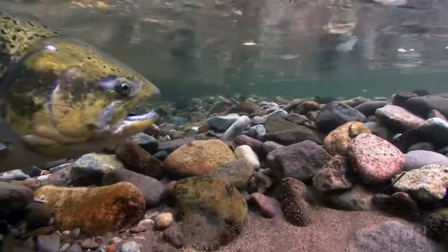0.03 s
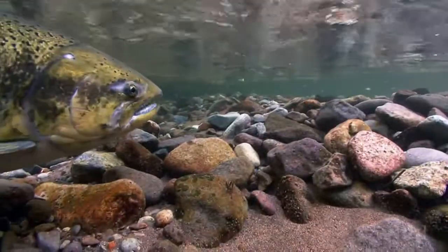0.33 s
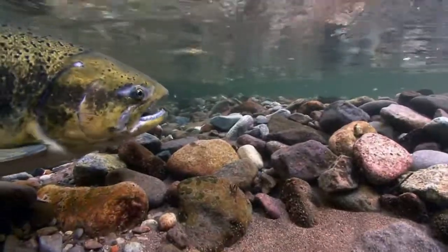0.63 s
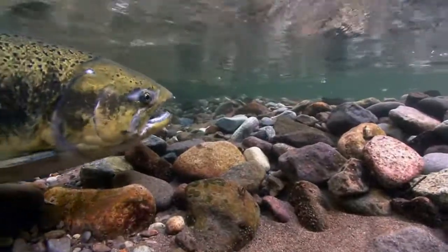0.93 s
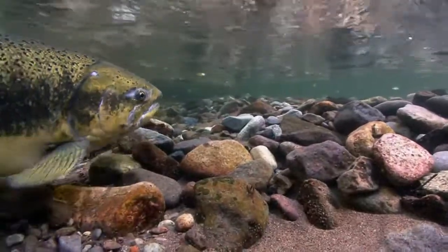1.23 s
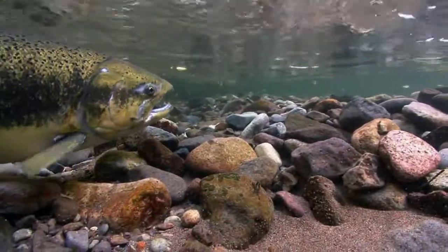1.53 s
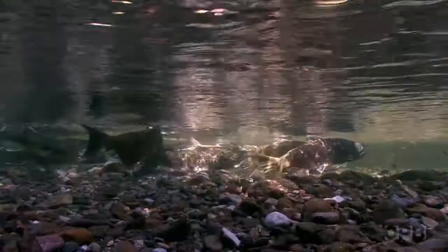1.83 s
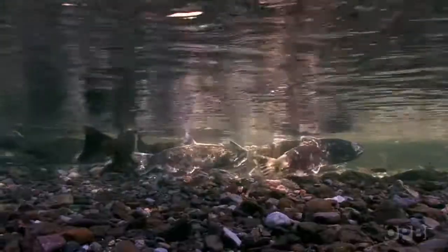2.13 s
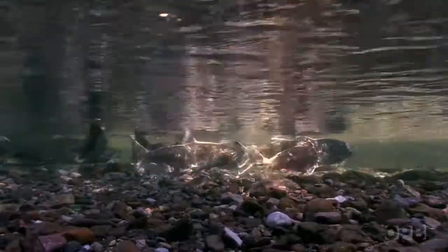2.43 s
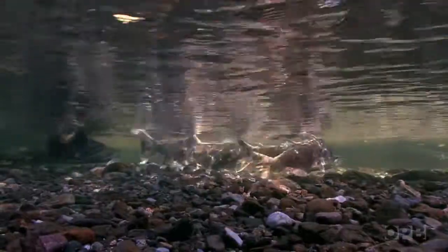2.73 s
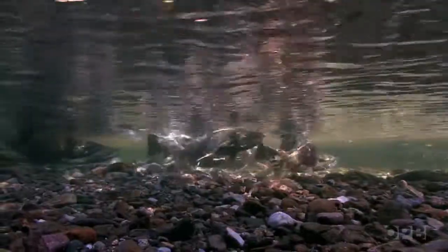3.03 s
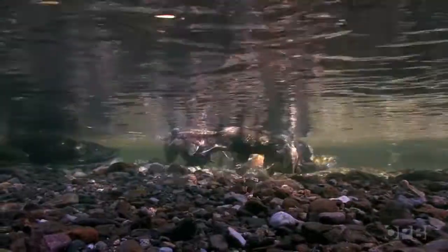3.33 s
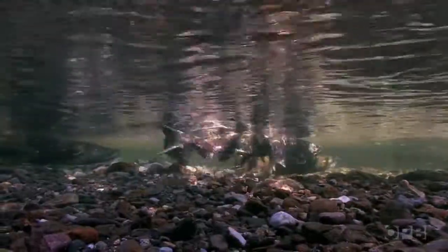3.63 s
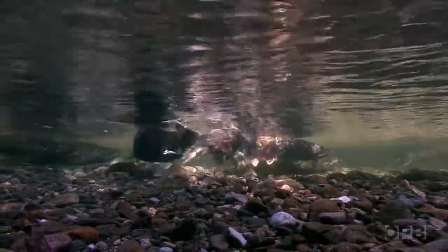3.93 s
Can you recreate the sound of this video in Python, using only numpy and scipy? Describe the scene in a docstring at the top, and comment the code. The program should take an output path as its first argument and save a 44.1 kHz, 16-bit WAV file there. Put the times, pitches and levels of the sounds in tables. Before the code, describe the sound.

Low underwater rush of a river, with bubble plops and flurries of clicking pebbles.

```python
"""Gravel riverbed, under water

A microphone lies on the bed of a shallow river, heard in the left channel only. The current rushes
and buffets it with a low rumble. Air bubbles ring at first and a fine fizz goes on. Pebbles shift
and knock in two dull flurries that also ring the microphone housing, with fine ticks of grit."""
import sys
import numpy as np
from scipy import signal
from scipy.fft import rfft, irfft
from scipy.io import wavfile

SR = 44100
rng = np.random.default_rng(int(sys.argv[2]) if len(sys.argv) > 2 else 0)


def transcribe(u):
    """Save the signal u as a 16-bit wav file named by the first command-line argument.

    u: samples, shape (n,) or (channels, n), limited to [-1, 1]; the rate is SR.
    q: integer samples, one column per channel.
    """
    v = np.clip(np.atleast_2d(u).T, -1, 1)
    q = np.round(v * 32767).astype(np.int16)
    wavfile.write(sys.argv[1], SR, q)


N = 176400
T = np.arange(N) / SR


def from_db(db):
    """Decibels to gain."""
    return 10 ** (np.asarray(db) / 20)


def unit_rms(x):
    """Scale to rms 1."""
    return x / np.sqrt(np.mean(x ** 2) + 1e-20)


def level(curve):
    """Gain over time from rows of time_s, level_db."""
    return from_db(np.interp(T, *np.transpose(curve)))


def noise(spectrum):
    """Unit-rms noise shaped by rows of freq_hz, density_db."""
    hz, db = np.transpose(spectrum)
    bins_hz = np.maximum(np.fft.rfftfreq(N, 1 / SR), 1)
    gain = from_db(np.interp(np.log(bins_hz), np.log(hz), db))
    return unit_rms(irfft(rfft(rng.standard_normal(N)) * gain, N))


def band(x, low_hz, high_hz, order=4):
    """Causal band-pass."""
    return signal.sosfilt(signal.butter(order, [low_hz, high_hz], "band", fs=SR, output="sos"), x)


def ring(clicks, hz, t60_s):
    """Resonator: each click starts a damped sine of its own height."""
    r, w = from_db(-60 / (t60_s * SR)), 2 * np.pi * hz / SR
    return signal.lfilter([0, np.sin(w)], [1, -2 * r * np.cos(w), r * r], clicks + 1e-18)


def grains(per_s, spread_db):
    """Random clicks of uneven size and sign."""
    sizes = from_db(spread_db * np.minimum(rng.exponential(1, N), 4))
    return sizes * rng.choice([-1, 1], N) * (rng.random(N) < per_s / SR)


def dying_sine(hz, t60_s, attack_s, rise_per_s=0, sustain=1):
    """Sine that swells and decays; sustain above 1 holds the ring, then drops it faster."""
    t = T[:SR // 4]
    envelope = (1 - np.exp(-t / attack_s)) * from_db(-60 * (t / t60_s) ** sustain)
    phase = 2 * np.pi * hz * (t + rise_per_s * t * t / 2)
    return envelope / envelope.max() * np.sin(phase)


def add(track, start_s, sound, gain_db):
    """Mix a sound into the track."""
    start = int(start_s * SR)
    part = sound[:max(N - start, 0)]
    track[start:start + len(part)] += from_db(gain_db) * part


# freq_hz, density_db
RUSH_SPECTRUM = [(12, -18.5), (33, 5.5), (50, -12), (100, -2), (160, -1.5), (250, -5), (320, -8.5),
                 (480, -10.5), (750, -21), (1000, -18), (1400, -28.5), (1850, -33.5), (2250, -41.5),
                 (3100, -40.5), (3500, -48), (3800, -64.5), (6000, -75.5)]


def rush():
    """The current flows past with a steady, low noise."""
    return from_db(-30) * noise(RUSH_SPECTRUM)


# time_s, level_db
WATER_PUSH = [(0, -29.5), (.12, -26.5), (.25, -34), (.43, -31), (.49, -25), (.55, -27), (.61, -33),
              (.8, -35), (1.25, -38), (1.53, -36), (1.62, -30.5), (1.72, -32.5), (1.9, -37.5),
              (2.08, -42.5), (4, -47)]
# freq_hz, density_db
BUFFET_SPECTRUM = [(12, -20.5), (25, -11.5), (55, 3.5), (100, -8.5), (160, -10.5), (260, -27), (500, -21),
                   (1200, -75.5)]


def buffeting():
    """Water pushes on the microphone in rumbling surges that churn when strong."""
    push = level(WATER_PUSH)
    rumble = from_db(5.5) * push * noise(BUFFET_SPECTRUM)
    churn = unit_rms(band(rng.standard_normal(N), low_hz=119, high_hz=207.5))
    return rumble + from_db(-26.5) * (push / push.max()) ** 2 * churn


# time_s, level_db
HISS_LEVEL = [(0, -68), (1.65, -65.5), (1.85, -69.5), (3.468, -68), (3.476, -74), (4, -75)]
# freq_hz, density_db
HISS_SPECTRUM = [(1000, -18), (3900, -2), (4900, 8), (6000, 4), (7500, 3.5), (7900, 6), (8400, 3),
                 (11000, 2), (15000, 0)]


def hiss():
    """Faint high noise that drops near the end."""
    return level(HISS_LEVEL) * noise(HISS_SPECTRUM)


# freq_hz, gain_db, t60_s
KNOCK_MODES = [(546, -0.5, 0.024), (757, 1.5, 0.035), (1152, -4.5, 0.013), (1707, -13, 0.015),
               (1930, -19.5, 0.021), (2310, -24, 0.0072)]


def knock_ring(clicks, pitch_hz, bright_db):
    """Contacts ring two low pebble tones, set by size, and four fixed modes of the microphone housing."""
    reference_hz = 740
    out = 0
    for k, (hz, db, t60_s) in enumerate(KNOCK_MODES):
        octaves_up = np.clip(np.log2(hz / reference_hz), 0, 1)
        mode_hz = hz * pitch_hz / reference_hz if octaves_up < .5 else hz
        out += (-1) ** k * from_db(db + bright_db * octaves_up) * ring(clicks, mode_hz, t60_s)
    return band(out, low_hz=432, high_hz=2235)


# time_s, level_db
GRAVEL_STIR = [(0, -39.5), (.6, -43), (1.17, -42), (1.26, -38), (1.42, -41), (1.66, -39), (1.8, -36.5),
               (1.88, -35.5), (2.03, -32), (2.18, -46.5), (2.31, -37.5), (2.5, -45.5), (2.61, -41),
               (2.75, -44.5), (3.45, -45.5), (3.56, -38.5), (3.7, -35.5), (3.8, -48), (4, -45)]


def gravel():
    """Many small, water-cushioned contacts among pebbles of several sizes."""
    pitches_hz = np.geomspace(640, 830, num=5)
    rattle = np.zeros(N)
    for hz in pitches_hz:
        contacts = grains(per_s=700 / len(pitches_hz), spread_db=2)
        rattle += knock_ring(contacts, hz, bright_db=-6.5)
    return from_db(5) * level(GRAVEL_STIR) * unit_rms(rattle)


def fizz():
    """Tiny bubbles in the current pip at random; smaller ones ring higher and shorter."""
    low_hz, high_hz, t60_cycles = 1452, 3496, 39
    pitches_hz = np.geomspace(low_hz, high_hz, num=14)
    pips = np.zeros(N)
    for hz in pitches_hz:
        onsets = grains(per_s=220 / len(pitches_hz), spread_db=2.5)
        pips += ring(onsets, hz, t60_cycles / hz)
    return from_db(-58.5) * unit_rms(band(pips, low_hz, high_hz))


# freq_hz, gain_db, t60_s
SAND_MODES = [(3120, 3.5, 0.0049), (4520, -7.5, 0.0069), (5230, -5.5, 0.0038), (6430, -10, 0.0045)]


def sand():
    """Drifting grains ring faintly, their level loosely following the hiss."""
    drift = np.zeros(N)
    for hz, db, t60_s in SAND_MODES:
        contacts = grains(per_s=700 / len(SAND_MODES), spread_db=3.5)
        drift += from_db(db) * ring(contacts, hz, t60_s)
    return from_db(-65.5) * unit_rms(drift * level(HISS_LEVEL) ** .11)


# start_s, level_db, pitch_hz, t60_s
BUBBLE_TONES = [(0.0513, -28.5, 1840, 0.033), (0.0532, -30.5, 2330, 0.014), (0.0521, -28.5, 1550, 0.019),
                (.053, -24.5, 590, 0.022), (.0532, -18, 797, 0.03), (.133, -28, 835, .025),
                (0.1999, -19.5, 803, 0.05), (.2595, -24.5, 840, 0.033), (0.354, -11, 800, 0.071),
                (0.3533, -34, 1580, 0.019), (.398, -28.5, 847, 0.035), (0.459, -20.5, 775, 0.044),
                (0.535, -43, 1520, 0.021), (.714, -30.5, 724, .026), (0.946, -43, 1510, .018),
                (2.673, -44, 1510, .016), (2.749, -41, 1790, .018), (3.992, -34.5, 1844, 0.0078)]


def bubbles():
    """Each row is one ringing, slightly rising tone; rows starting together form one bubble's plop."""
    out = np.zeros(N)
    for start_s, level_db, pitch_hz, t60_s in BUBBLE_TONES:
        tone = dying_sine(pitch_hz, t60_s, attack_s=.0008, rise_per_s=2.4, sustain=1.28)
        add(out, start_s, tone, level_db + 4.5)
    return out


# start_s, level_db, pitch_hz
EDDY_THUMPS = [(.072, -16, 88), (0.086, -13.5, 52), (.136, -20, 56.5), (0.463, -14.5, 59.5),
               (0.523, -22, 79), (0.71, -15, 50), (1.344, -14, 43.3), (1.568, -16, 47.5), (1.61, -22, 61.6),
               (2.786, -23, 49)]


def eddies():
    """Each eddy shoves the microphone for two or three slow swings."""
    out = np.zeros(N)
    for start_s, level_db, pitch_hz in EDDY_THUMPS:
        add(out, start_s, dying_sine(pitch_hz, t60_s=.081, attack_s=.0033), level_db)
    return out


# start_s, level_db, low_hz, high_hz
GRIT_TICKS = [(.258, -48, 4000, 6000), (.355, -29.5, 1090, 2600), (0.3565, -36, 2400, 5500),
              (0.355, -38, 5000, 15000), (1.338, -50, 3900, 5200), (1.747, -53, 5730, 6940),
              (1.776, -32, 1310, 4000), (1.776, -44, 3960, 8500), (1.876, -52, 4800, 6400),
              (1.908, -36.5, 3520, 7400), (1.9097, -28.5, 1790, 2700), (2.27, -41, 3530, 13000),
              (2.371, -43.5, 3500, 5500), (2.614, -49, 3800, 8000), (2.623, -47, 3800, 8400),
              (3.066, -49.5, 4000, 5940), (3.648, -46.5, 3800, 8400), (3.709, -36.5, 3400, 7500),
              (3.85, -43, 4200, 5940), (3.865, -44.5, 3100, 5150)]


def grit():
    """Single grains tick: a snap, a short crunch and a glassy ring."""
    snap_height, crunch_t60_s = 14.8, .014
    out, t = np.zeros(N), T[:SR // 30]
    for start_s, level_db, low_hz, high_hz in GRIT_TICKS:
        crack = rng.standard_normal(len(t)) * from_db(-60 * t / crunch_t60_s)
        crack[0] = snap_height
        glassy = from_db(-31.5) * ring(crack, hz=6500, t60_s=.018)
        tick = band(crack + glassy, low_hz, high_hz, order=3)
        add(out, start_s, tick / np.abs(tick).max(), level_db + 3.5)
    return out


# start_s, level_db, pitch_hz, bright_db
PEBBLE_KNOCKS = [(1.180, -24, 663, -6), (1.252, -23, 686, -10), (1.270, -26.5, 690, -7),
                 (1.297, -26.5, 807, -11), (1.648, -26, 723, -7), (1.7069, -24, 794, 2.5),
                 (1.712, -17.5, 718, -3), (1.7455, -18.5, 796, 5.5), (1.748, -17, 708, -4),
                 (1.758, -21, 720, -8), (1.7755, -15.5, 758, -2.5), (1.833, -20.5, 738, -5),
                 (1.846, -21.5, 730, 2), (1.859, -22.5, 700, -13), (1.882, -20, 683, -17),
                 (1.892, -20, 740, -21), (1.9077, -11, 787, -1.5), (1.934, -25, 695, -4),
                 (1.999, -20, 608, -7), (2.012, -34, 635, -3), (2.029, -29.5, 753, 6.5),
                 (2.0505, -16, 760, -10.5), (2.134, -26, 713, -5), (2.300, -20.5, 690, -4.5),
                 (2.317, -25, 760, -9), (2.3585, -20.5, 730, -7), (2.384, -29.5, 780, -18),
                 (2.586, -31, 725, 2), (2.614, -25.5, 777, 1), (2.623, -33, 680, 10),
                 (3.030, -25.5, 690, -21), (3.532, -27.5, 772, -17), (3.549, -26, 720, -4),
                 (3.632, -27.5, 770, -5), (3.649, -21.5, 804, 2), (3.672, -30, 760, 15),
                 (3.697, -24.5, 720, 5), (3.709, -13.5, 802, 2), (3.712, -18.5, 564, -21)]


def knocks():
    """Pebbles collide: one firm contact, then a few lighter touches as they settle."""
    touches, settle_s, knock_s = 3, .004305, .01
    out = np.zeros(N)
    for start_s, level_db, pitch_hz, bright_db in PEBBLE_KNOCKS:
        strengths = from_db(-3) * rng.uniform(-1.38, 1, touches)
        delays_s = rng.random(touches) * settle_s
        clicks = np.zeros(SR // 10)
        clicks[(delays_s * SR).astype(int)] = strengths
        clicks[0] = 1
        knock = knock_ring(clicks, pitch_hz, bright_db)
        knock_rms = np.sqrt(np.sum(knock ** 2) / (knock_s * SR))
        add(out, start_s, knock / knock_rms, level_db - 1.5)
    return out


def scene():
    """One microphone, wired to the left channel."""
    current = rush() + buffeting() + hiss() + eddies()
    water = current + gravel() + knocks() + bubbles() + fizz() + sand() + grit()
    return np.array([water, from_db(-90) * water])


def record(dry):
    """Steep low-pass."""
    order, ripple_db, cutoff_hz = 12, .1, 15500
    return signal.sosfilt(signal.cheby1(order, ripple_db, cutoff_hz, fs=SR, output="sos"), dry)


dry = scene()
out = record(dry)
transcribe(out)
```